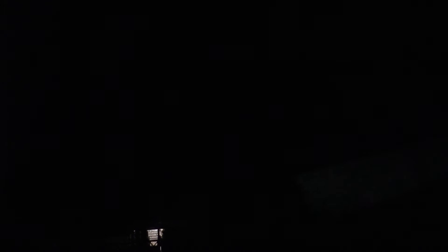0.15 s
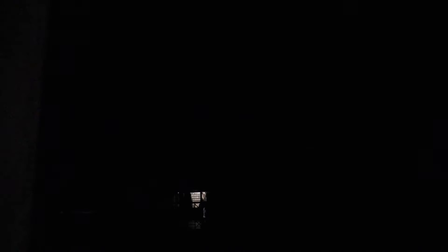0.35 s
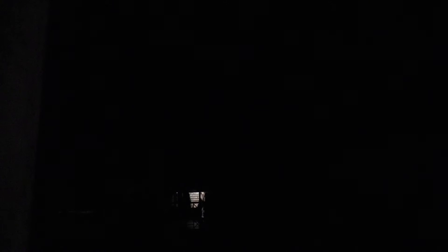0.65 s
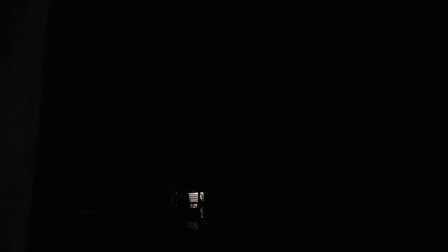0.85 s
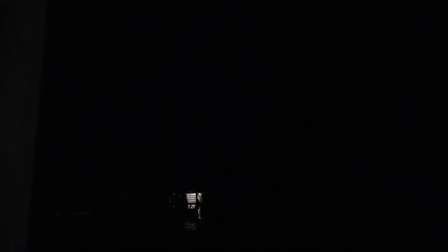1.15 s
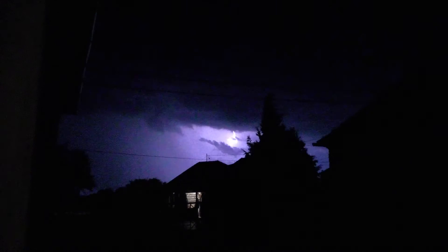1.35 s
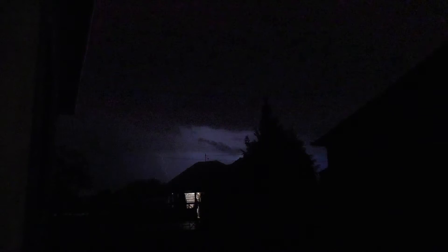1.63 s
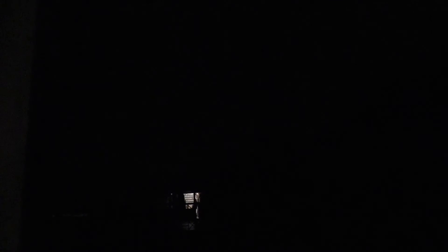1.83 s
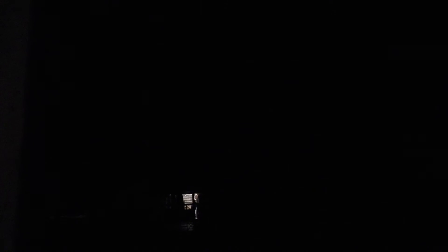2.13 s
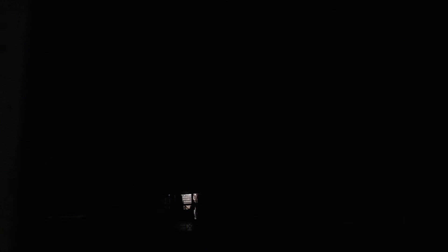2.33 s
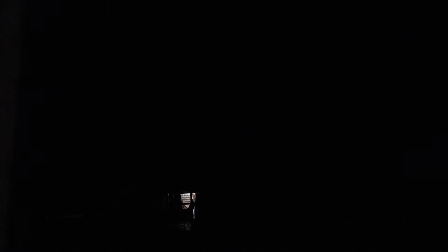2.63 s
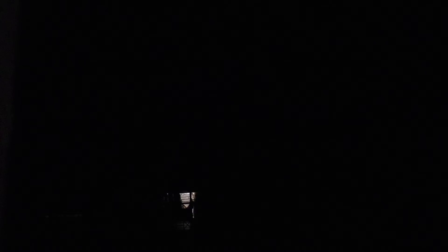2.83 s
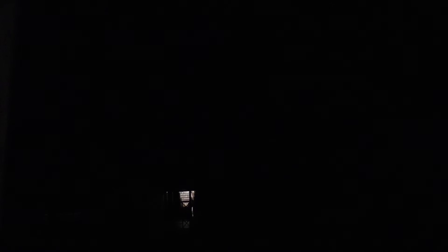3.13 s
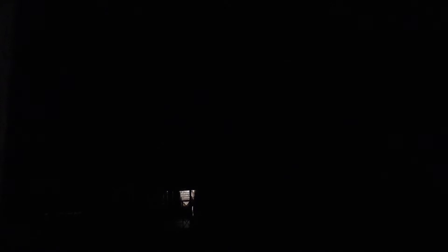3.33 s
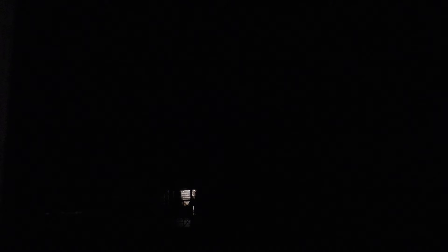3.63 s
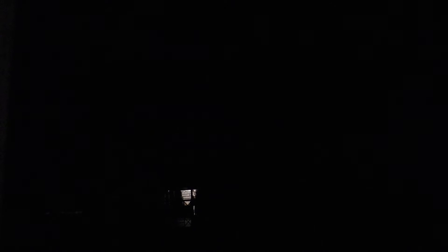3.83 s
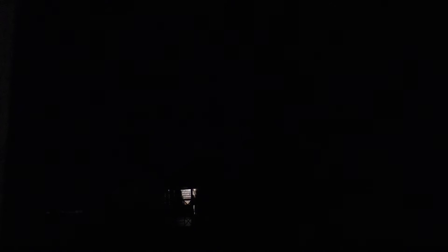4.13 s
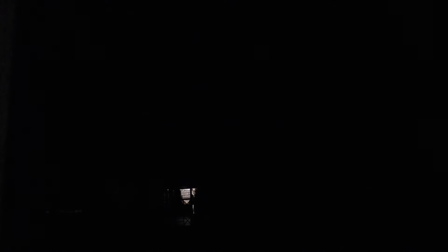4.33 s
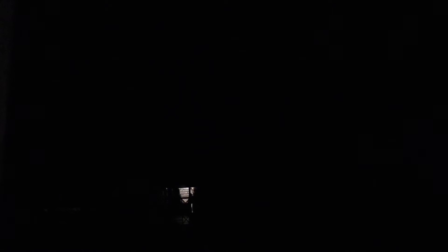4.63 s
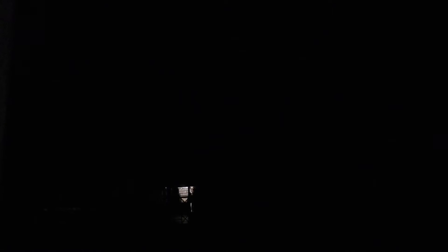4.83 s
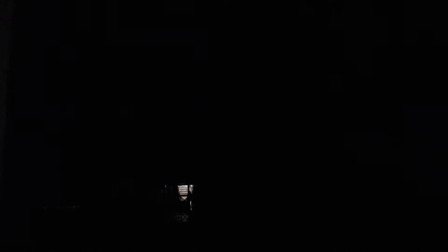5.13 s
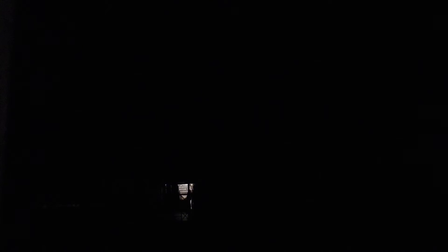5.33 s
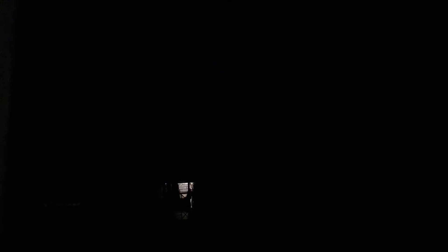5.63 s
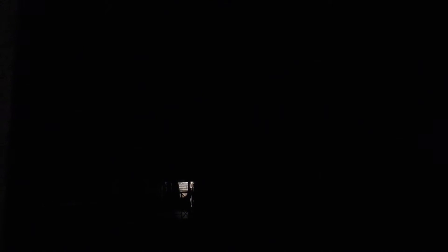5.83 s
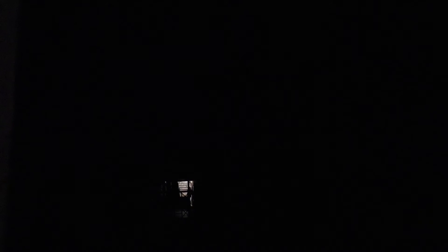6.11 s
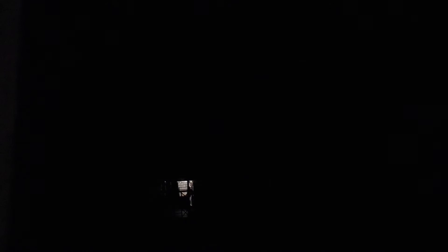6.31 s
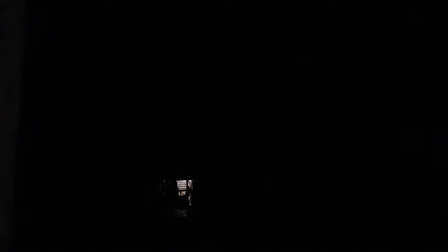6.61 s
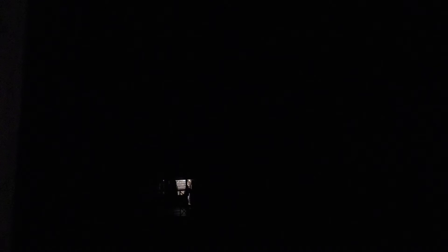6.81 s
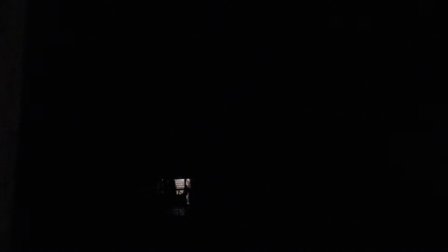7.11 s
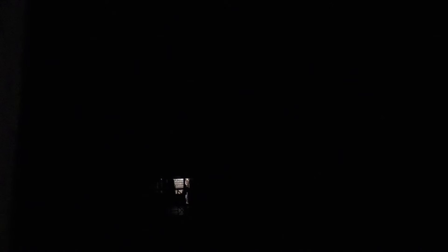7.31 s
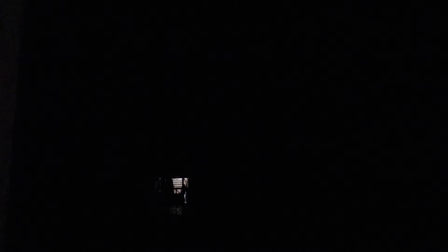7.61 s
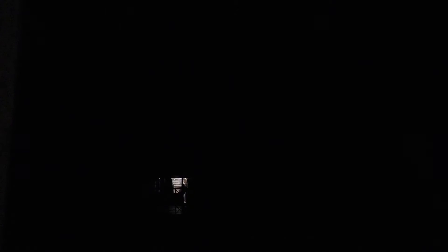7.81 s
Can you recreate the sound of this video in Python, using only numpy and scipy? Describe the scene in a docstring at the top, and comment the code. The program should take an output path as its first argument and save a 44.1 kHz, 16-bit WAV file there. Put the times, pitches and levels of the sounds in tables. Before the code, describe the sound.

Distant night thunder breaks with a crackling clap and keeps rumbling in uneven waves, above soft hiss, bush crickets and small handling ticks.

```python
"""Summer night, quiet street, small hand-held camera. From the start thunder rolls (random shocks with
echoes, under peals and booms) over hiss, a far car's fading tyre roar (shaped noise) and bush crickets
(throbbing noise band). From 0.5 s claps crack (single echoed shocks); from 0.9 s the top treble swells
(noise). From 1.1 s the camera body ticks in the hand (noise snaps with ringing); at 1.8 s and 6.1 s
high falling squeaks, likely a bat (sine sweeps), echo off the houses."""
import sys
import numpy as np
from scipy import signal
from scipy.fft import rfft, irfft, next_fast_len
from scipy.io import wavfile
from scipy.ndimage import uniform_filter1d

SR = 44100
rng = np.random.default_rng(int(sys.argv[2]) if len(sys.argv) > 2 else 0)


def wav_out(sig):
    """Save sig, one row per channel (or a flat mono array), as 16-bit PCM at SR to the path in sys.argv[1]."""
    wavfile.write(sys.argv[1], SR, np.round(np.clip(np.atleast_2d(sig).T, -1, 1) * 32767).astype(np.int16))


N = 351291
TIME_S = np.arange(N) / SR
COARSE_S = np.arange(0, N, 64) / SR
FFT_LEN = next_fast_len(N + SR)
FFT_HZ = np.fft.rfftfreq(FFT_LEN, 1 / SR)


def gain_of(db):
    """Amplitude factor of a level in dB."""
    return 10 ** (np.asarray(db) / 20)


def evened(x):
    """x at rms 1."""
    return x / np.sqrt(np.mean(x ** 2) + 1e-20)


def read(points, hz):
    """Table value at hz, interpolated on a log-frequency axis."""
    point_hz, value = np.transpose(points)
    return np.interp(np.log(hz + 1), np.log(point_hz + 1), value)


def along(points):
    """Time curve of a two-column table, one value a sample."""
    point_s, value = np.transpose(points)
    return np.interp(TIME_S, point_s, value)


def add(mix, start_s, sound):
    """Adds sound into mix in place, cut at the end."""
    part = mix[round(start_s * SR):][:len(sound)]
    part += sound[:len(part)]


def coloured(x, points):
    """x filtered by a spectrum table, at rms 1."""
    spectrum = rfft(x, FFT_LEN) * gain_of(read(points, FFT_HZ))
    return evened(irfft(spectrum, FFT_LEN)[:N])


def drift(top_hz):
    """Slow chance up to top_hz: 30 sines of random phase, rms 1."""
    rates_hz = top_hz * np.geomspace(.05, 1, 30)
    slow = sum(np.sin(2 * np.pi * (hz * COARSE_S + rng.random())) for hz in rates_hz)
    return np.interp(TIME_S, COARSE_S, evened(slow))


def tail(t60_s):
    """Echoes off many surfaces: dying noise of energy 1."""
    t = np.arange(SR // 2) / SR
    echoes = rng.standard_normal(len(t)) * gain_of(-60 * t / t60_s)
    return echoes / np.linalg.norm(echoes)


def scatter(x, t60_s):
    """x as the surroundings return it: convolved with an echo tail."""
    return signal.oaconvolve(x, tail(t60_s))[:N]


# microphone ports: (frequency [Hz], left-right likeness [0-1])
PORT_LIKENESS = [(40, 1), (80, 0.93), (160, .9), (300, 0.95), (700, 0.62), (1300, 0.18), (3300, 0.28),
                 (5500, 0.69), (9000, 1), (15000, 1)]
# (frequency [Hz], lead of the left port [rad])
PORT_LEAD = [(60, 0), (260, -.5), (780, -.2), (1460, .7), (1890, 2.3), (3790, .8), (5860, 0), (16000, 0)]
# (frequency [Hz], left minus right [dB])
PORT_TILT = [(60, 2), (150, 0.5), (380, -3.5), (950, -4.5), (2380, -1), (5980, 0), (15000, -0.5)]


def ports(x, other):
    """Two close ports: a shared part with lead and tilt, plus a part of its own on the right."""
    likeness = np.clip(read(PORT_LIKENESS, FFT_HZ), 0, 1)
    half_tilt = gain_of(read(PORT_TILT, FFT_HZ) / 2)
    left, own = rfft(x, FFT_LEN), rfft(other, FFT_LEN)
    shared = likeness * left * np.exp(-1j * read(PORT_LEAD, FFT_HZ))
    right = shared + np.sqrt(1 - likeness ** 2) * own
    return irfft(np.array([left * half_tilt, right / half_tilt]), FFT_LEN)[:, :N]


# peals, each a branch of the channel: (arrival [s], middle-shock level [dB], long far shocks re middle [dB],
# short near shocks re middle [dB], time to rise 10 dB [s], fade [dB/s])
PEALS = [(0.0, -63.5, 4.2, -6, 0.052, 7.0), (0.358, -59.5, 4.6, -5.7, 0.01, 0.0),
         (0.934, -34, 3.5, -10, 0.011, 17.0), (1.484, -40.5, -3.1, -10.9, 0.25, 22.4),
         (2.515, -33.7, -10.2, -15.2, 0.027, 14.2), (3.584, -38.6, -3.0, -12.9, 0.049, 7.3),
         (4.775, -36.6, -4.8, -12.3, 0.193, 14.0), (5.867, -47.5, 13.3, -3.6, 0.104, 14.7),
         (6.74, -44.5, 6.2, -13.4, 0.25, 3.0)]
# lumps of shocks arriving together: (peak time [s], middle-shock level [dB], long shocks re middle [dB],
# short shocks re middle [dB], time to rise 10 dB [s])
BOOMS = [(0.532, -49.6, 4.8, -2.6, 0.038), (0.738, -47.7, -1.2, -6.3, 0.042),
         (0.808, -67.5, 17.3, 8.2, 0.16), (1.036, -47.6, 17.6, -13.4, 0.026),
         (1.077, -29.5, -18.7, -11.8, 0.063), (1.241, -25.2, 1.3, -18.4, 0.023),
         (1.512, -36.4, -10.0, -10.5, 0.021), (1.742, -40.0, -0.1, -15.8, 0.149),
         (1.983, -37.3, -15.6, -12.0, 0.052), (2.257, -38.0, -3.9, -13.4, 0.129),
         (2.501, -38.4, 10.0, -9.7, 0.029), (2.65, -37.4, 0.1, -20.5, 0.16),
         (2.81, -29.5, -3.5, -25.0, 0.049), (3.039, -24.5, -4.4, -25.0, 0.055),
         (3.062, -32.8, 1.5, -12.6, 0.16), (3.352, -36.7, -7.5, -13.6, 0.059),
         (3.449, -33.1, -4.9, -13.4, 0.04), (3.585, -38.0, 7.8, -7.4, 0.036),
         (3.637, -35.1, 9.2, -10.3, 0.022), (3.757, -29.9, -2.8, -18.7, 0.074),
         (3.886, -37.0, 1.9, -9.0, 0.045), (4.01, -42.1, 5.5, -10.7, 0.12),
         (4.262, -32.0, -12.0, -16.0, 0.022), (4.3, -37.0, -8.0, -12.0, 0.13),
         (4.738, -31.5, -4.0, -22.0, 0.025), (4.809, -30.1, 5.7, -25.0, 0.038),
         (4.914, -43.4, 9.5, -21.2, 0.104), (5.225, -29.3, 2.2, -18.5, 0.057),
         (5.351, -56.4, 21.1, 5.1, 0.062), (5.504, -46.4, 14.4, -6.5, 0.058),
         (5.59, -42.0, 4.8, -13.9, 0.046), (5.763, -59.2, 22.8, 1.3, 0.012),
         (5.94, -24.4, 4.1, -22.4, 0.06), (6.1, -45.8, 24.2, -24.1, 0.043),
         (6.155, -27.3, 1.9, -16.2, 0.135), (6.305, -28.7, -8.0, -25.0, 0.017),
         (6.414, -30.7, 5.0, -14.7, 0.072), (6.556, -46.3, 16.0, -9.7, 0.032),
         (6.685, -35.1, 1.0, -12.0, 0.104), (6.914, -55.3, 13.7, 4.5, 0.025),
         (7.881, -41.4, -10.6, -25.0, 0.06)]
LINGER = 1.3  # boom fall time / rise time


def arrivals():
    """Gains of the long, middle and short shocks: peals and booms add up in power."""
    booms = [(*boom, 10 / (LINGER * boom[-1])) for boom in BOOMS]
    power = 0
    for s, level_db, long_db, short_db, rise_s, fade_db_per_s in list(PEALS) + booms:
        slope_db_per_s = np.where(COARSE_S < s, 10 / rise_s, -fade_db_per_s)
        shape_db = slope_db_per_s * (COARSE_S - s)
        bands_db = np.array([[long_db], [0], [short_db]])
        power = power + gain_of(level_db + shape_db + bands_db) ** 2
    return [np.interp(TIME_S, COARSE_S, np.sqrt(p)) for p in power]


def steadied(x, share=0.52):
    """Takes a share of the slow chance swells out, so that peals and booms set them."""
    local_power = abs(uniform_filter1d(x[0] ** 2, 1500))
    return evened(x / (local_power + 0.077) ** (share / 2))


# after air, ground and walls: (frequency [Hz], relative spectral level [dB])
THUNDER_SPECTRUM = [(12, -69), (20, -16), (49, -15), (85, -0.5), (152, -4), (198, 0), (262, -5.5),
                    (339, -0.5), (534, -18.5), (692, -20), (859, -30), (1040, -28.5), (1380, -32),
                    (1910, -49.5), (3500, -59), (4550, -80), (7700, -120)]
# the nearest kinks' crackle: (time [s], gain on short-shock treble [dB])
NEARNESS = [(0, 4), (.9, 8), (.95, 7), (1.3, 8.), (1.5, -3), (7.97, -2.)]
LONG_BELOW_HZ, SHORT_ABOVE_HZ, CRACKLE_ABOVE_HZ = 220, 520, 1400
SHOCKS_PER_S = 900  # mean rate


def thunder(directions=10):
    """Every kink of the channel sends one shock; they arrive scattered, a few large, and echo on."""
    long_gain, middle_gain, short_gain = arrivals()
    sign = rng.choice([-1., 1.], N)
    size = gain_of(2.5 * np.minimum(rng.exponential(1, N), 5)) * sign
    shocks = size * (rng.random(N) < SHOCKS_PER_S / SR)
    direction = rng.integers(0, directions, N)
    spectrum = np.zeros((2, len(FFT_HZ)), complex)
    for k in range(directions):  # own echoes per direction and port
        echoes = np.array([tail(0.071) + gain_of(-5) * tail(0.33) for port in range(2)])
        spectrum += rfft(shocks * (direction == k), FFT_LEN) * rfft(echoes, FFT_LEN)
    spectrum *= gain_of(read(THUNDER_SPECTRUM, FFT_HZ))

    low = 1 / (1 + (FFT_HZ / LONG_BELOW_HZ) ** 10)
    high = 1 / (1 + (SHORT_ABOVE_HZ / (FFT_HZ + 1)) ** 10)
    bands = [irfft(spectrum * share, FFT_LEN)[:, :N] for share in (low, 1 - low - high, high)]
    long, middle, short = (steadied(evened(band)) for band in bands)

    highpass = signal.butter(2, CRACKLE_ABOVE_HZ, "high", fs=SR, output="sos")
    crackle = signal.sosfilt(highpass, short)
    short = short + (gain_of(along(NEARNESS)) - 1) * crackle
    return ports(*(long_gain * long + middle_gain * middle + short_gain * short))


# shared by hiss and crickets: (time [s], level offset [dB])
HISS_RISE = [(0, -4), (1., 2.2), (4., 1.9), (7.97, 1.6)]
# air and microphone hiss: (frequency [Hz], relative spectral level [dB])
HISS_SPECTRUM = [(880, -20), (1500, -1), (2100, -3), (3130, -4.5), (4810, -11.5), (6330, -14), (7900, -18),
                 (9500, -4.5), (12300, -13.5), (15600, -9.5)]
# tyre roar: (frequency [Hz], relative spectral level [dB])
CAR_SPECTRUM = [(600, -25), (1100, -1.5), (1600, -3.5), (2400, -6.5), (4000, -21.5)]
# (time [s], tyre roar level [dB])
CAR_FADE = [(0, -57), (.3, -58.5), (.6, -62), (2.5, -61.5), (7.97, -85)]
HISS_DB = -61  # before HISS_RISE


def night():
    """Hiss of air and microphone and the fading tyre roar of a far car, as shaped noise."""
    hiss_gain = gain_of(along(HISS_RISE) + HISS_DB + 0.47 * drift(6))
    car_gain = gain_of(along(CAR_FADE))
    parts = []
    for part in range(2):
        hiss = coloured(rng.standard_normal(N), HISS_SPECTRUM)
        car = coloured(rng.standard_normal(N), CAR_SPECTRUM)
        parts.append(hiss_gain * hiss + car_gain * car)
    return ports(*parts)


# (frequency [Hz], relative spectral level [dB])
CRICKET_SPECTRUM = [(8100, -33.5), (8900, -11.5), (9500, -4), (10300, -17.5), (11800, -17.5)]
CRICKETS_DB = -70  # before HISS_RISE


def crickets():
    """Many wings rasp at once: a high noise band that throbs unevenly, nearly alike at both ports."""
    throb = gain_of(CRICKETS_DB + along(HISS_RISE) + 1.7 * drift(15))
    rasps = []
    for part in range(2):
        grains = gain_of(2.0 * rng.exponential(1, N)) * rng.standard_normal(N)
        rasps.append(coloured(grains, CRICKET_SPECTRUM))
    alike, opposed = rasps
    return throb * (alike + gain_of(-11.5) * opposed * [[1], [-1]])


# single large kinks standing out of the roll: (time [s], peak level before the ports [dB])
CLAPS = [(0.528, -42), (0.721, -36.5), (0.928, -38), (1.24, -30), (3.438, -37), (3.583, -38), (3.835, -47),
         (4.252, -42), (5.223, -36), (6.416, -32), (6.678, -37)]


def claps():
    """One sharp shock with its first echoes, tilted brighter than the thunder spectrum."""
    out, size = np.zeros((2, N)), 2 ** 15
    hz = np.fft.rfftfreq(size, 1 / SR)
    colour = gain_of(read(THUNDER_SPECTRUM, hz) + 6. * np.log2(hz / 300 + .05))
    lead_in = 100  # samples kept ahead of the shock
    for s, peak_db in CLAPS:
        for part in out:
            echoed = irfft(rfft(tail(0.07), size) * colour)
            clap = np.roll(echoed, lead_in)[:8000]
            add(part, s - lead_in / SR, gain_of(peak_db) * clap / abs(clap).max())
    return ports(*out)


# (swell centre [s], gain on rms-1 noise [dB])
SHIMMER = [(.85, -67), (1.3, -65), (3.45, -66), (5.12, -63), (5.68, -65), (6.29, -64), (6.65, -65)]


def shimmer():
    """The very top of the treble swells softly: noise under Gaussian bumps."""
    swell = sum(gain_of(db) * np.exp(-((TIME_S - s) / .07) ** 2) for s, db in SHIMMER)
    return swell * coloured(rng.standard_normal(N), [(13000, -47), (14800, -5), (15800, -11)])


# (time [s], relative level [dB], hump centre [Hz], treble shelf re hump [dB])
TICKS = [(1.0798, -35, 2800, 22), (1.392, -49, 4500, -25), (1.4159, -26, 3400, -15), (1.450, -36, 3000, -6),
         (2.375, -48.5, 2480, -30), (2.884, -51, 3500, -25), (7.822, -53, 12500, -15)]
# camera body modes: (frequency [Hz], relative level [dB], t60 [s])
BODY_MODES = [(1460, 4, 0.011), (1800, -1, 0.014), (2110, -9, 0.022), (3100, -1.5, 0.016),
              (3400, -10, 0.017), (4220, -3.5, 0.011), (5100, 0, .006)]


def ticks():
    """A dry snap under the fingers rings the body and shakes the ports apart, mostly in the lows."""
    alike, opposed = np.zeros(N), np.zeros(N)
    t = np.arange(1024) / SR
    ring = sum(gain_of(db - 60 * t / t60_s) * np.sin(2 * np.pi * f * t) for f, db, t60_s in BODY_MODES)
    hz = np.fft.rfftfreq(2048, 1 / SR) + 1
    body = 1 + rfft(ring / np.linalg.norm(ring), 2048)
    alike_opposed = np.array([hz ** 0, 2200 / (hz + 300)])
    for s, level_db, centre_hz, treble_db in TICKS:
        snap = rng.standard_normal((2, 1024)) * t ** 2 * np.exp(-t / 0.0013)
        hump = gain_of(-6.5 * np.log2(hz / centre_hz) ** 2)
        treble = gain_of(treble_db) / (1 + (hz / 14000) ** 8)
        tick = irfft(rfft(snap, 2048) * body * (hump + treble) * alike_opposed)[:, :1500]
        onset_rms = np.sqrt(np.mean(tick[0, :250] ** 2))
        tick = gain_of(level_db - 7.5) * tick / onset_rms
        add(alike, s - .001, tick[0])
        add(opposed, s - .001, tick[1])
    return np.array([alike - opposed, alike + opposed])


# (time [s], level before path gains [dB], start [Hz], end [Hz], length [s], fall exponent: higher flattens out)
SQUEAKS = [(1.799, -37, 15700, 12200, .0045, 0.95), (6.127, -39, 16000, 12370, 0.0052, 2.6)]
# direct path, then walls: (delay [s], path gain [dB])
WALLS = [(0, -18), (.0095, -0.5), (.020, 2), (.026, -9), (.033, -3), (.037, -4), (.051, -9)]


def squeaks():
    """A fast falling sine sweep; the walls return it louder than it comes direct."""
    out = np.zeros(N)
    for s, level_db, start_hz, end_hz, length_s, bend in SQUEAKS:
        u = np.arange(0, length_s, 1 / SR) / length_s
        hz = end_hz + (start_hz - end_hz) * (1 - u) ** bend
        envelope = np.sin(np.pi * u ** 1.1) ** 0.88
        call = gain_of(level_db) * np.sin(2 * np.pi * np.cumsum(hz) / SR) * envelope
        for delay_s, path_db in WALLS:
            add(out, s + delay_s, gain_of(path_db) * call)
    squeak = out + gain_of(-3) * scatter(out, 0.27)
    return squeak + gain_of(-22) * scatter(squeak, .03) * [[1], [-1]]  # width: opposed at the ports


def scene():
    """Sum of all layers, left and right."""
    return thunder() + night() + crickets() + claps() + shimmer() + ticks() + squeaks()


EDGE_HZ = 15760


def record(dry):
    """Band limit: a steep linear-phase low-pass at EDGE_HZ."""
    lowpass = signal.firwin(1023, EDGE_HZ, window=("kaiser", 9), fs=SR)
    return signal.oaconvolve(dry, lowpass[None], "same")


dry = scene()
out = record(dry)
wav_out(out)
```